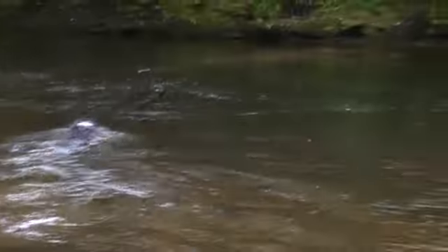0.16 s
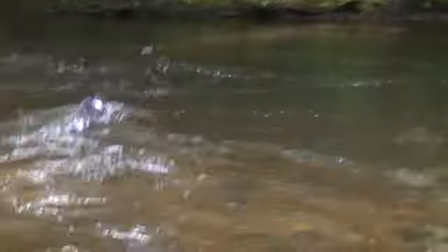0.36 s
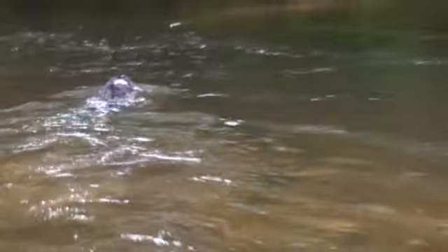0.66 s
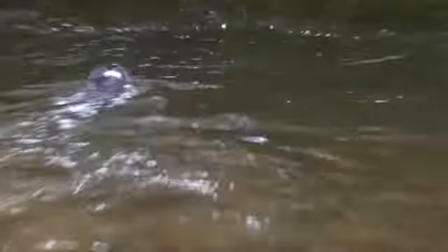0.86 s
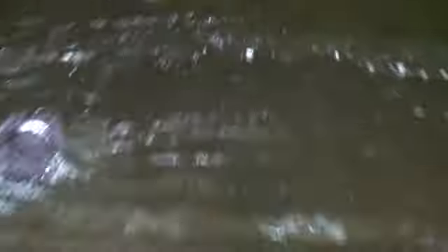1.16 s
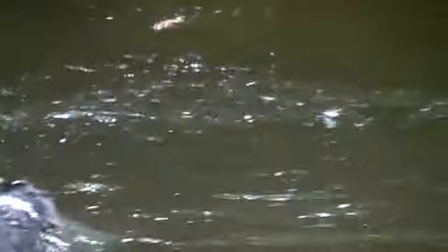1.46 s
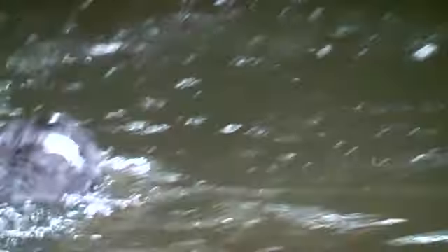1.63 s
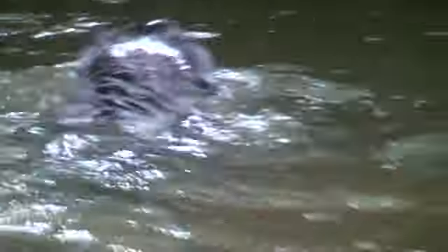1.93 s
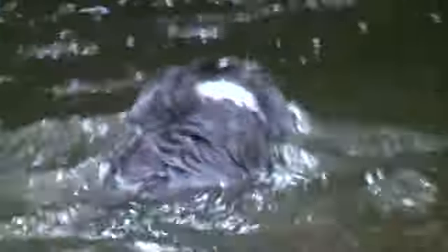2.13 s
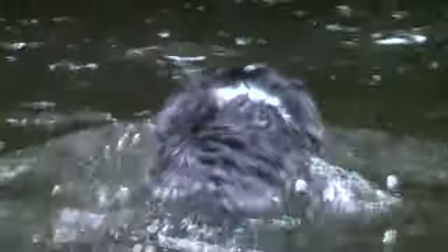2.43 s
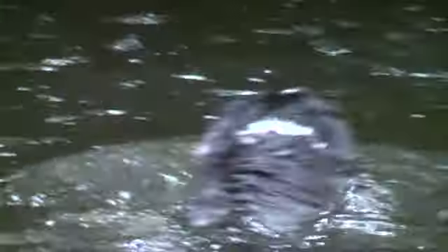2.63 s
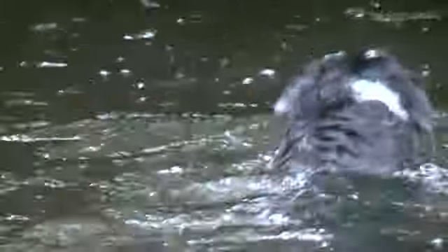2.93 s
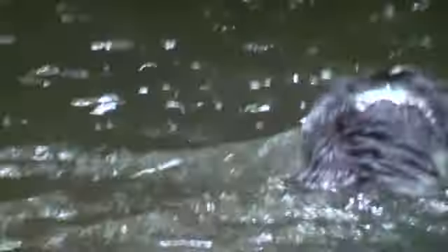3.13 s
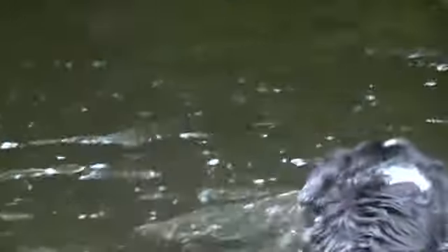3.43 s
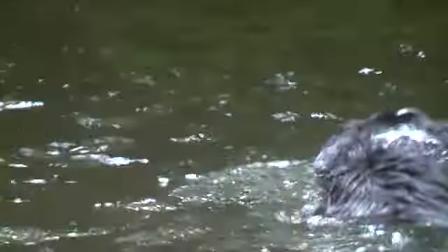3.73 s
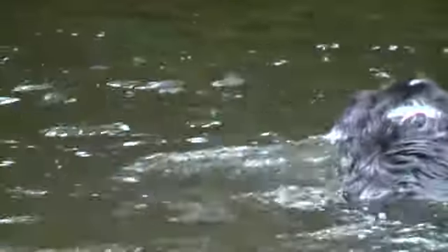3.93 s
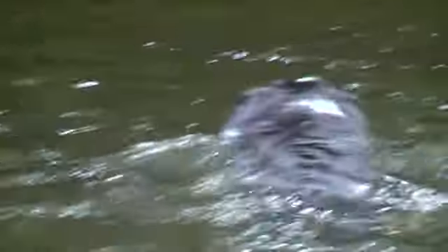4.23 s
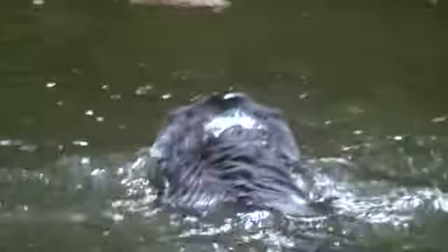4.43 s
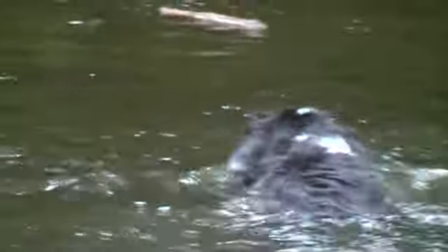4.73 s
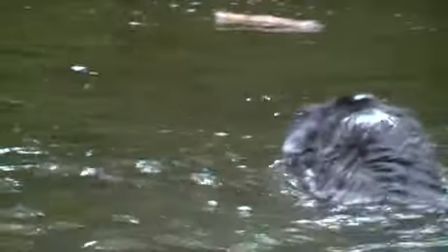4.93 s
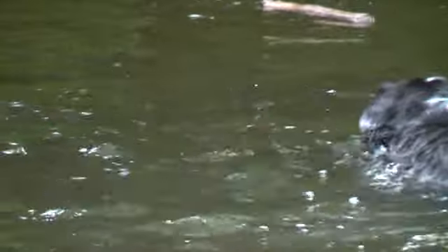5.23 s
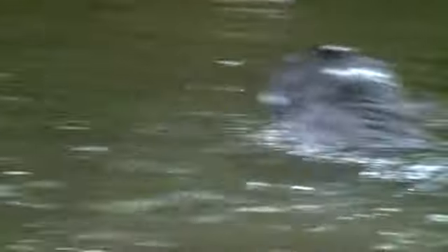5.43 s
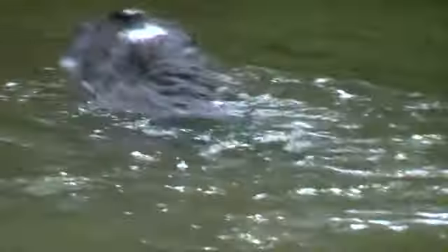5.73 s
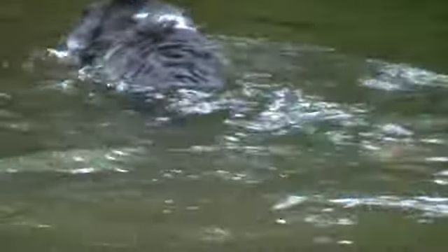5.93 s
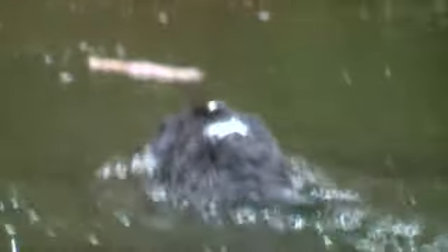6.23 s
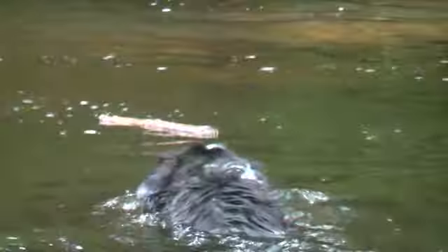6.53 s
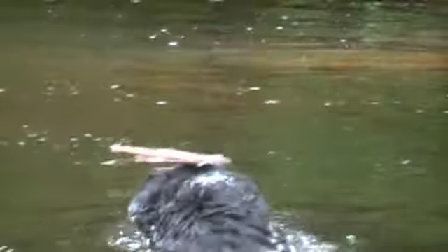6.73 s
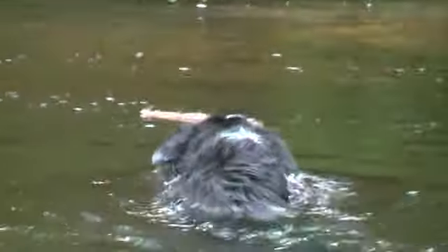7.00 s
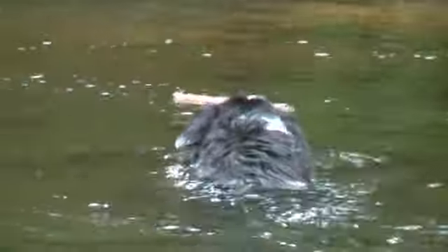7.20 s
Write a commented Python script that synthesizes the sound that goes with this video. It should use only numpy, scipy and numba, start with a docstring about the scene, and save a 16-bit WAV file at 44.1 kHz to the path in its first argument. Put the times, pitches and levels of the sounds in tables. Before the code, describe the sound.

A dog paddles through a shallow river with fizzing spray, hollow glugs and irregular sloshing strokes over a steady, soft rush of current.

```python
"""First a fizzing spray and a steady wash: a dog paddles past in a shallow river, over the rush of the current.
Spray and wash, made of noise and clouds of decaying bubble tones, follow one effort curve.
Each stroke adds a surge of mid-sized bubbles and deep gulps; glugs, gliding notes, drops, splashes and
thuds lie on top. Struck modes give one hollow knock with a rebound, and three faint metallic tinks,
as of a collar tag. Diffuse scatter from the banks surrounds it all; the current is banded noise."""
import sys
import numpy as np
from scipy import signal
from scipy.io import wavfile
from numba import njit

SR = 44100
rng = np.random.default_rng(int(sys.argv[2]) if len(sys.argv) > 2 else 0)


def digitize_waveform(pressure):
    """Quantize a signal to 16-bit integers and store it at the path in sys.argv[1].

    Rows of a 2-D input are taken as channels; values are limited to [-1, 1].
    """
    field = np.atleast_2d(pressure).T
    bounded = np.clip(field, -1, 1)
    quanta = np.round(bounded * 32767).astype(np.int16)
    wavfile.write(sys.argv[1], SR, quanta)


N = 324683  # length [samples]


def from_db(db):
    """Level definition: decibels to amplitude gain."""
    return 10 ** (np.asarray(db) / 20)


def rms_one(x):
    """Normalisation of power: scale to unit rms."""
    return x / np.sqrt(np.mean(x ** 2) + 1e-20)


def in_time(rows):
    """Linear interpolation: a (time, value) curve at every sample."""
    s, value = np.transpose(rows)
    return np.interp(np.arange(N) / SR, s, value)


def at_hz(points, hz):
    """Logarithmic frequency scale: read a spectrum between its points."""
    point_hz, value = np.transpose(points)
    return np.interp(np.log(hz), np.log(point_hz), value)


def panned(pan_db):
    """Interaural level difference: left and right gains for left minus right [dB]."""
    return from_db(np.array([[.5], [-.5]]) * pan_db)


def drift(rate_hz):
    """Low-passed chance: a slow random curve with spread 1."""
    step = 40  # samples between drawn points
    r = np.exp(-2 * np.pi * rate_hz * step / SR)
    white = rng.standard_normal(N // step + 2002)
    slow = signal.lfilter([1], [1, -2 * r, r * r], white)[2000:]  # drop the filter's start-up
    return np.interp(np.arange(N) / step, np.arange(len(slow)), rms_one(slow))


# left-right likeness of open water: (frequency [Hz], likeness [0-1])
LIKENESS = [(40, 0.82), (150, 0.99), (400, 0.88), (1000, 0.7), (2000, 0.35), (4500, 0.7), (8000, 0.33),
            (13000, 0)]


def banded_noise(spectrum, patchy_db):
    """Filter-bank synthesis: half-octave noise bands with own level, flicker and stereo likeness; rms 1."""
    out = 0
    edges = 30 * 2 ** np.arange(0, 9.1, .5)
    white = rng.standard_normal((2, 2, N))  # neighbouring bands use different noise
    for k, (low, high) in enumerate(zip(edges, edges[1:])):
        band = signal.butter(2, [low, high], "band", fs=SR, output="sos")
        mid, side = signal.sosfilt(band, white[k % 2])
        hz = np.sqrt(low * high)
        alike = np.clip(at_hz(LIKENESS, hz), 0, 1)
        gain = from_db(at_hz(spectrum, hz) + patchy_db * drift(13.6))
        stereo = np.sqrt(1 + alike) * mid + np.sqrt(1 - alike) * side * [[1], [-1]]
        out = out + gain * stereo
    return rms_one(out)


@njit
def ring_bubbles(start, hz, gains, cycles, rise):
    """Bubble resonance: each swells within a cycle, dies by 60 dB over its cycles and rises in pitch near the surface."""
    out = np.zeros((2, N))
    for k in range(len(start)):
        first, length = int(start[k] * SR), int(cycles[k] * SR / hz[k])
        for i in range(max(0, -first), min(length, N - first)):
            age, turns = i / length, i * hz[k] / SR
            tone = np.sin(2 * np.pi * turns * (1 + rise * age / 2))
            wave = tone * np.exp(-6.9 * age) * min(1., turns)
            out[0, first + i] += gains[0, k] * wave
            out[1, first + i] += gains[1, k] * wave
    return out


def bubble_cloud(count, low_hz, high_hz, cycles, size_db, width_db, rise, spectrum=None):
    """Random superposition: bubbles of chance time, place, pitch, damping and strength; rms 1."""
    when, pitch, damping, sign = rng.random((4, count))
    size, place = np.clip(rng.standard_normal((2, count)), -2, 2)
    hz = low_hz * (high_hz / low_hz) ** pitch
    gain = from_db(size_db * size) * np.sign(sign - .5)
    gain = gain * np.sqrt(hz)  # equal energy in each octave
    if spectrum is not None:
        gain = gain * np.sqrt(hz) * from_db(at_hz(spectrum, hz))  # equal energy per Hz, then shaped
    gains = gain * panned(width_db * place)
    return rms_one(ring_bubbles(when * N / SR, hz, gains, cycles * (.5 + damping), rise))


def spatter(per_s, fall_s):
    """Shot noise: random gouts of water land at once and drain away; mean 0, spread 1."""
    gouts = (rng.random(N) < per_s / SR) * rng.uniform(.3, 1, N)
    level = signal.lfilter([1], [1, -np.exp(-1 / (fall_s * SR))], gouts)
    return rms_one(level - level.mean())


# spectrum of thrown water: (frequency [Hz], relative level [dB per Hz])
SPRAY_SPECTRUM = [(300, -16.5), (700, -2.5), (1200, -2.5), (2000, -3), (3200, -3), (4800, -4), (6800, -8),
                  (9000, -9.5), (12500, -24.5)]
SPRAY_TOP_HZ = 12900  # the spray is cut above this


def spray(spray_db):
    """Granular noise: thrown water falls in gouts, as a hiss, a fizz of tiny bubbles and sparser, longer-ringing droplets."""
    hiss = banded_noise(SPRAY_SPECTRUM, patchy_db=1.4)
    fizz = from_db(-3.5) * bubble_cloud(
        count=44000, low_hz=924, high_hz=12180, cycles=15.5, size_db=2.0,
        width_db=8.5, rise=0.018, spectrum=SPRAY_SPECTRUM)
    droplets = from_db(-15.0) * bubble_cloud(
        count=1800, low_hz=934, high_hz=11300, cycles=77, size_db=6.0,
        width_db=12.0, rise=0.033, spectrum=SPRAY_SPECTRUM)
    fall = (hiss + fizz + droplets) * from_db(spray_db + spatter(per_s=27, fall_s=0.058))
    fall = signal.sosfilt(signal.ellip(8, .1, 60, SPRAY_TOP_HZ, fs=SR, output="sos"), fall)
    coarse = signal.sosfilt(signal.butter(1, 9000, fs=SR, output="sos"), fall)
    fine = fall - coarse
    return coarse + fine * from_db(0.93 * (spray_db + 22.0))  # harder splashing throws finer spray


# paddle strokes that stir the surface:
# (start [s], push length [s], slosh level [dB], deep churn level [dB])
STROKES = [(0.018, 0.047, -30.5, -47), (0.196, 0.015, -32, -56), (0.323, 0.12, -32, -41),
           (0.534, 0.22, -36.5, -42), (0.831, 0.061, -27.5, -42), (1, 0.14, -28.5, -38.5),
           (1.3, 0.18, -29, -44.5), (1.564, 0.03, -32, -30), (1.634, 0.029, -26.5, -31),
           (1.714, 0.049, -32.5, -52), (1.963, 0.13, -32, -54), (2.175, 0.1, -38, -40),
           (3.521, 0.062, -33.5, -53), (3.677, 0.12, -33.5, -45), (3.91, 0.018, -35, -43),
           (4.01, .04, -34.5, -53), (4.386, 0.018, -31.5, -62), (4.855, 0.13, -29.5, -37),
           (5.006, 0.068, -27.5, -35), (5.194, 0.034, -32.5, -32), (5.42, 0.053, -31.5, -56),
           (5.564, 0.26, -30.5, -35.5), (5.929, 0.14, -33.5, -41.5), (6.112, 0.26, -34, -38.5)]
# a stroke swells, holds while the paw pushes, then drains away
STROKE_ATTACK_S, STROKE_RELEASE_S = 0.0053, 0.085
WASH_SLOSH_DB, SLOSH_FOLLOWS = -39, 0.73  # wash at the usual effort [dB]; dB per dB of effort
WASH_CHURN_DB, CHURN_FOLLOWS = -52, 0.14  # the same for the deep churn


def paddling(extra_effort_db):
    """Power addition: slosh and churn levels [dB] from a wash that follows effort and a surge on every stroke."""
    t = np.arange(N) / SR
    slosh_power = from_db(WASH_SLOSH_DB + SLOSH_FOLLOWS * extra_effort_db) ** 2
    churn_power = from_db(WASH_CHURN_DB + CHURN_FOLLOWS * extra_effort_db) ** 2
    for s, length, slosh_db, churn_db in STROKES:
        swell = np.clip((t - s) / STROKE_ATTACK_S, 0, 1)
        drain = np.exp(-np.clip((t - s - length) / STROKE_RELEASE_S, 0, 20))
        surge = swell * drain
        slosh_power = slosh_power + (from_db(slosh_db) * surge) ** 2
        churn_power = churn_power + (from_db(churn_db) * surge) ** 2
    return 10 * np.log10(slosh_power), 10 * np.log10(churn_power)


# spectrum of the folded-in bubbles: (frequency [Hz], relative level [dB per Hz])
SLOSH_SPECTRUM = [(300, -4.5), (420, -5.5), (520, -3), (680, -3), (850, -11), (1150, -8), (1500, -15.5)]
# spectrum of the deep gulps: (frequency [Hz], relative level [dB per Hz])
CHURN_SPECTRUM = [(120, -8.5), (210, 4), (285, 3.5), (330, 3)]


def slosh(slosh_db, churn_db):
    """Air entrainment: the bow wave folds in mid-sized bubbles and the legs churn large ones below."""
    folds = bubble_cloud(count=5600, low_hz=291.6, high_hz=1520, cycles=22.8, size_db=1.8,
                         width_db=0.0, rise=0.21, spectrum=SLOSH_SPECTRUM)
    gulps = bubble_cloud(count=1900, low_hz=126.5, high_hz=315, cycles=8.4, size_db=2.5,
                         width_db=-3.0, rise=0.081, spectrum=CHURN_SPECTRUM)
    return folds * from_db(slosh_db) + gulps * from_db(churn_db)


# small breaking splashes: (start [s], level [dB], length [s], typical bubble pitch [Hz])
SPLASHES = [(0.11, -30.5, 0.034, 3000), (0.308, -30, 0.016, 2000), (.385, -30.5, .035, 1200),
            (0.85, -31.5, 0.068, 1010), (1.031, -30, 0.066, 1510), (1.647, -31, 0.044, 1970),
            (1.862, -30.5, 0.023, 1030), (1.953, -38, .07, 1100), (2.367, -35, 0.039, 2500),
            (3.318, -28.5, 0.032, 1020), (3.4022, -19, 0.0017, 2920), (3.678, -29.5, 0.017, 1750),
            (3.799, -32, .035, 3600), (3.927, -28, 0.039, 1400), (4.153, -31, 0.019, 1510),
            (4.316, -32, 0.028, 1140), (4.712, -29.5, 0.046, 2300), (4.81, -25.5, 0.014, 1300),
            (5.182, -28.5, .036, 2100), (5.201, -25.5, 0.012, 3020), (5.218, -30.5, .034, 2600),
            (5.392, -30.5, 0.022, 1510)]


def splashes():
    """Wave breaking: a crest bursts into small bubbles, swelling fast and draining away."""
    out = 0
    for s, level_db, length, centre_hz in SPLASHES:
        pitch, size, place = np.clip(rng.standard_normal((3, 160)), -2, 2)
        born = s + length / 4 * rng.gamma(2, size=len(pitch))
        hz = centre_hz * 2 ** (.55 * pitch)
        gains = size * np.sqrt(hz) * panned(4 * place)
        burst = ring_bubbles(born, hz, gains, np.full(len(hz), 5.), 0.42)
        # spread the level over the splash, not the whole scene
        out = out + from_db(level_db) * rms_one(burst) * np.sqrt(length * SR / N)
    return out


# the largest air pockets closing: (start [s], pitch [Hz], peak level [dB], swell time [cycles])
GLUGS = [(.313, 950, -18.5, 2.1), (.345, 245, -26, 1.2), (.395, 800, -16, 3.4), (.592, 230, -24, 2.8),
         (0.645, 534, -21.5, 2.3), (.694, 760, -17, 1.6), (.815, 504, -18, 2.6), (.846, 696, -23, 5),
         (0.857, 268, -18, 2.3), (.996, 834, -18, 2.8), (1.011, 750, -19, 3.7), (1.126, 258, -17, 2),
         (1.1372, 670, -12.5, 2.8), (1.377, 674, -12.5, 0.72), (1.498, 408, -16, 0.89),
         (1.572, 224, -17.5, 1.4), (1.647, 623, -21, 0.99), (1.647, 281, -11, 0.68),
         (1.665, 290, -16.5, 1.34), (1.866, 690, -22.5, 3), (1.986, 520, -13, 0.77), (2.057, 820, -31, 4.9),
         (2.115, 570, -25, 2.6), (3.134, 754, -25.5, 2.5), (3.510, 597, -19.5, 1), (3.563, 418, -22.5, 1.2),
         (3.585, 398, -21.5, 1.7), (3.681, 704, -20, 2.6), (3.722, 643, -16.5, 1.9), (3.763, 516, -17, 4.8),
         (3.938, 784, -17, 2.8), (4.035, 483, -23, 3), (4.046, 556, -16, 1.3), (4.297, 557, -13.5, 1.1),
         (4.314, 445, -24, 3), (4.396, 625, -26, 6), (4.812, 262, -17, 1.4), (4.811, 484, -11.5, 2.4),
         (4.953, 804, -18, 2.3), (5.166, 450, -19, 2.2), (5.199, 199, -13.5, 1.24), (5.214, 202, -19, 0.9),
         (5.264, 638, -16, 4.4), (5.430, 640, -13.5, .8), (5.708, 506, -20, 2.4), (6.031, 550, -19.5, 2.3),
         (6.13, 236, -25, 2)]
GLUG_ROUNDNESS, GLUG_RISE = 3.06, 0.011  # gentleness of swell; share of pitch gained per swell time
SHED_DB, SHED_WITHIN_S = -16, .02  # base level of the shed bubbles against the glug; latest start


def glugs():
    """Cavity closure: an air pocket swells into a round ring and sheds two smaller bubbles."""
    out = np.zeros(N + SR)
    for s, hz, peak_db, swell in GLUGS:
        age = np.arange(int(7 * swell * SR / hz)) * hz / (swell * SR)  # in swell times
        envelope = (age * np.exp(1 - age)) ** GLUG_ROUNDNESS
        turns = swell * age * (1 + GLUG_RISE * (age / 2 - 1))
        ring = envelope * np.sin(2 * np.pi * turns)
        out[int(s * SR):][:len(ring)] += from_db(peak_db) * ring
    out = out[:N]
    s, hz, peak_db, _ = np.transpose(GLUGS)
    for delay, smaller, place in rng.random((len(s), 2, 3)).transpose(1, 2, 0):
        shed_hz = hz * 2 ** (0.61 + 1.16 * smaller)
        gains = from_db(peak_db + SHED_DB + 3.1 * (2.0 - smaller)) * panned(5 * (place - .5))
        out = out + ring_bubbles(s + SHED_WITHIN_S * delay, shed_hz, gains, np.full(len(s), 14.), 0.14)
    return out


# pockets that shrink as they rise:
# (start [s], length [s], first pitch [Hz], last pitch [Hz], peak level [dB])
GLOOPS = [(0.365, 0.067, 484, 833, -27.5), (1.987, 0.038, 593, 826, -25), (2.211, 0.041, 543, 745, -33),
          (2.276, 0.062, 160, 475, -31.5), (4.056, 0.046, 448, 760, -31)]


def gloops():
    """Resonance of a shrinking cavity: one swelling note that glides upwards."""
    out = np.zeros(N + SR)
    for s, length, first_hz, last_hz, peak_db in GLOOPS:
        age = np.arange(int(length * SR)) / (length * SR)
        hz = first_hz * (last_hz / first_hz) ** (age ** 1.33)
        tone = np.sin(2 * np.pi * np.cumsum(hz) / SR)
        out[int(s * SR):][:len(age)] += from_db(peak_db) * np.sqrt(np.sin(np.pi * age)) * tone
    return out[:N]


# single drops landing: (start [s], level [dB], pitch [Hz])
DROPS = [(2.6153, -18, 3850), (3.489, -20, 5400), (3.516, -14, 3940), (3.8013, -11, 4950)]


def drops():
    """Bubble entrapment: each drop traps one small bubble, a short plink."""
    s, level_db, hz = np.transpose(DROPS)
    gains = from_db(level_db) * panned(rng.normal(0, 2, len(s)))
    return ring_bubbles(s, hz, gains, np.full(len(s), 32.), .06)


# dull underwater pushes of the paws: (start [s], level [dB])
PUSHES = [(3.51, -35), (4.817, -24), (4.876, -29), (5.43, -32), (6.032, -29)]


def pushes():
    """Low-frequency pocket resonance: a paw drives a large pocket of water down, a soft thud."""
    s, level_db = np.transpose(PUSHES)
    return ring_bubbles(s, np.full(len(s), 90.), from_db([level_db, level_db]), np.full(len(s), 9.), .1)


def struck(blows, modes, rattle_s, sag_per_s):
    """Modal excitation: a blow and its dying rattle of tiny contacts ring the modes; later blows may ring lower."""
    age = np.arange(SR // 2) / SR
    out = np.zeros(N + SR)
    for s, blow_db, bright_hz, rattle_db in blows:
        blow = rng.standard_normal(len(age)) * from_db(rattle_db) * np.exp(-age / rattle_s)
        blow[0] += 1
        contact = signal.butter(2, bright_hz, fs=SR, output="sos")
        force = from_db(blow_db) * signal.sosfilt(contact, blow)
        tuning = 1 - sag_per_s * (s - blows[0][0])
        for k, (hz, mode_db, t60) in enumerate(modes):
            r = from_db(-60 / (t60 * SR))
            w = 2 * np.pi * hz * tuning / SR
            ring = signal.lfilter([.5, 0, -.5], [1, -2 * r * np.cos(w), r * r], force)
            out[int(s * SR):][:len(age)] += (-1) ** k * from_db(mode_db) * ring
    return out[:N]


# a hollow knock and its rebound:
# (start [s], blow level [dB], contact brightness [Hz], rattle against blow [dB])
KNOCKS = [(5.1477, -1, 13000, -29.5), (5.1662, -6.5, 3600, -28.5)]
# what the knock rings with: (frequency [Hz], relative level [dB], 60 dB decay time [s])
KNOCK_MODES = [(480, -10.5, 0.014), (1080, -8, 0.014), (1600, -10, 0.0096), (1780, -8.5, 0.019),
               (1990, -8, 0.03), (2700, -12, 0.012), (3900, -15, .004)]


def hollow_knock():
    """Damped modes under loading: the pitch sags as the knocked thing dips into the water."""
    # sag is the share of pitch lost per second
    return struck(KNOCKS, KNOCK_MODES, rattle_s=0.036, sag_per_s=2.2) * panned(2.5)


# tag tinks: (start [s], blow level [dB], contact brightness [Hz], rattle against blow [dB])
TINKS = [(.904, -28, 19000, -44), (1.157, -22.5, 14000, -32.5), (5.347, -21.5, 6300, -37)]
# modes of the tag: (frequency [Hz], relative level [dB], 60 dB decay time [s])
TAG_MODES = [(6000, 3, 0.016), (6260, 0, 0.16), (8930, -13, 0.05), (13950, -7, .008)]


def tag_tinks():
    """Lightly damped metal modes: each tink rings high and thin."""
    return struck(TINKS, TAG_MODES, rattle_s=0.1, sag_per_s=0) * panned(1.5)


def banks(x, t60, dull_hz):
    """Diffuse reflection: scatter from banks and trees, different at each ear, thin in the bass."""
    t = np.arange(SR // 2) / SR
    tail = rng.standard_normal((2, len(t))) * np.exp(-np.log(1000) * t / t60) * (t > .004)
    tail = rms_one(tail) / np.sqrt(len(t))  # unit energy
    tail = signal.sosfilt(signal.butter(1, [600, dull_hz], "band", fs=SR, output="sos"), tail)
    return signal.fftconvolve(x, tail, axes=1)[:, :N]


# spectrum of the current: (frequency [Hz], relative level [dB per Hz])
RIVER_SPECTRUM = [(30, -41), (55, -8.5), (75, -11), (110, -9.5), (200, -3), (400, -6), (650, 0),
                  (1000, -1.5), (2200, -6), (4500, -18.5), (9000, -59), (13000, -99)]


def river():
    """Broadband turbulence: the current as a smooth distant rush."""
    return banded_noise(RIVER_SPECTRUM, patchy_db=2.0) * from_db(-34.5) * panned(-0.72)


# how hard the dog works the water: (time [s], effort [dB])
EFFORT = [(0.0, -39.5), (0.43, -41), (0.55, -44), (1.19, -36.5), (1.55, -38.5), (2.43, -44.5),
          (2.53, -50.5), (2.77, -46.5), (2.97, -49), (3.33, -41.5), (3.69, -43.0), (4.13, -40), (4.19, -45),
          (4.63, -42), (4.87, -38), (5.03, -40.5), (5.53, -38.5), (5.69, -40.5), (6.43, -42), (6.57, -48.0),
          (7.36, -53)]
USUAL_EFFORT_DB = -42
SPRAY_DB = -32.0  # spray at the usual effort, rising dB for dB
# where the dog is heard: (time [s], left minus right [dB])
BEARING = [(0, 1.9), (2.6, 0), (3.7, 1), (6.2, 0.5), (7.36, -3)]


def scene():
    """Superposition: the near sounds, scattered lightly by the banks, over the river."""
    extra_effort_db = in_time(EFFORT) - USUAL_EFFORT_DB
    slosh_db, churn_db = paddling(extra_effort_db)
    moving = spray(SPRAY_DB + extra_effort_db) + slosh(slosh_db, churn_db) + splashes()
    water = moving * panned(in_time(BEARING)) + glugs() + gloops() + drops() + pushes()
    near = water + hollow_knock() + tag_tinks()
    return river() + near + from_db(-11.0) * banks(near, t60=0.26, dull_hz=6240)


def record(dry):
    """Band limitation: the microphone sheds the deep bass; the top is cut."""
    thin = signal.sosfilt(signal.butter(2, 62, "high", fs=SR, output="sos"), dry)
    return signal.sosfilt(signal.ellip(10, .1, 90, 14300, fs=SR, output="sos"), thin)


dry = scene()
out = record(dry)
digitize_waveform(out)
```